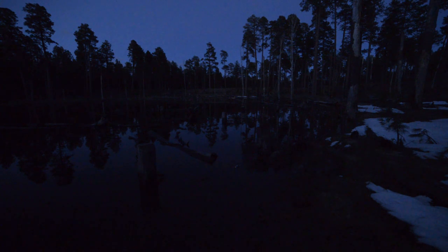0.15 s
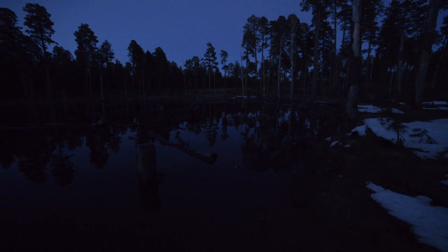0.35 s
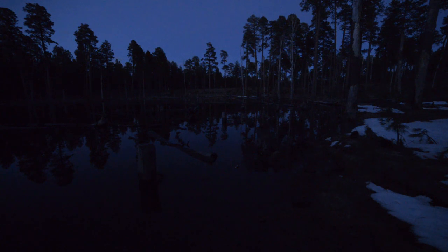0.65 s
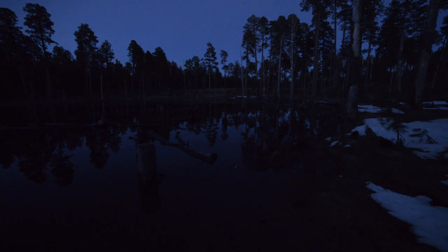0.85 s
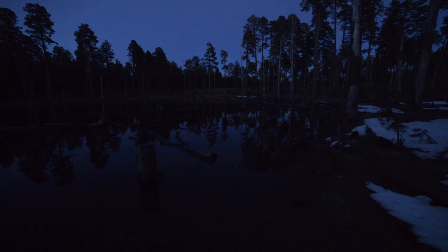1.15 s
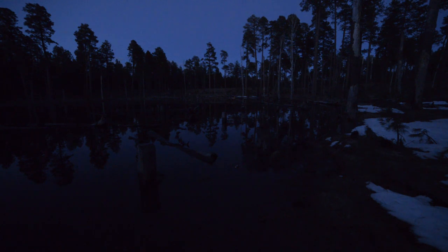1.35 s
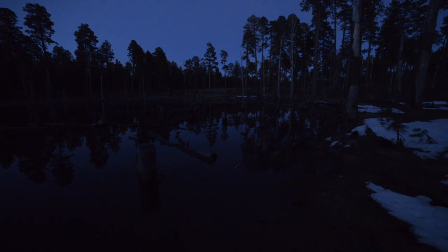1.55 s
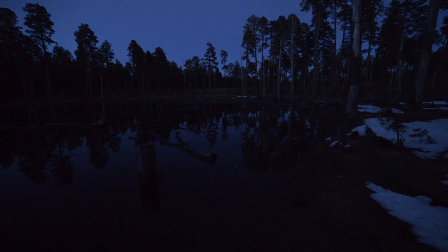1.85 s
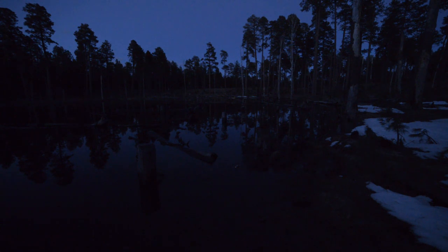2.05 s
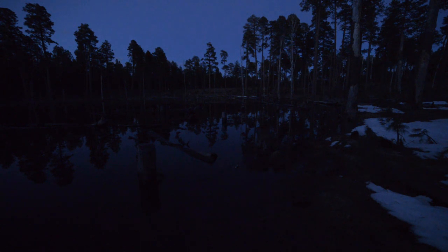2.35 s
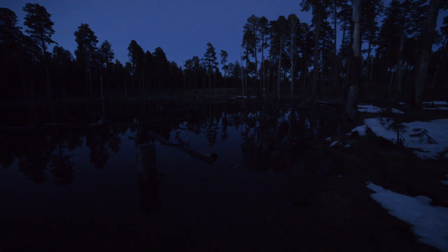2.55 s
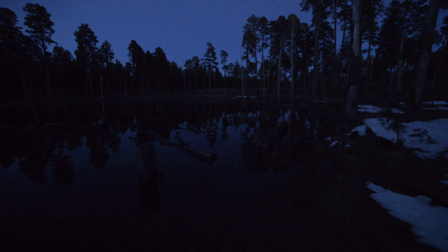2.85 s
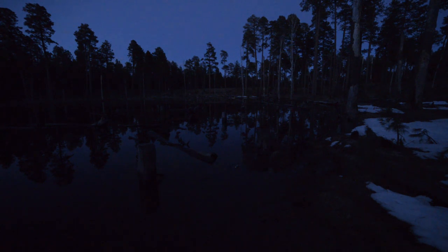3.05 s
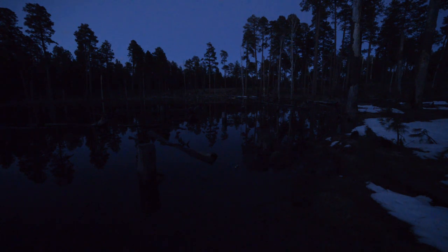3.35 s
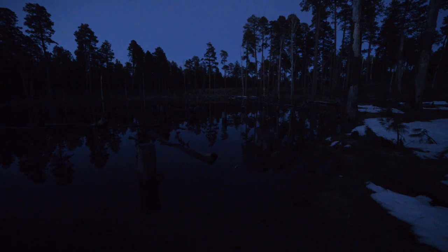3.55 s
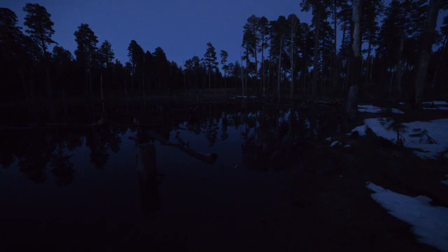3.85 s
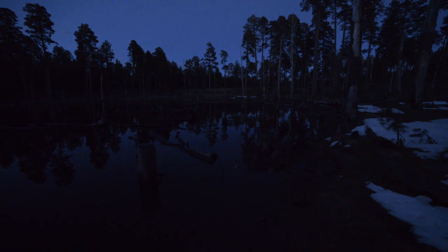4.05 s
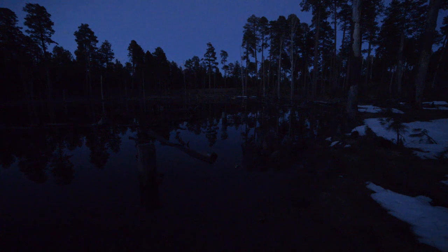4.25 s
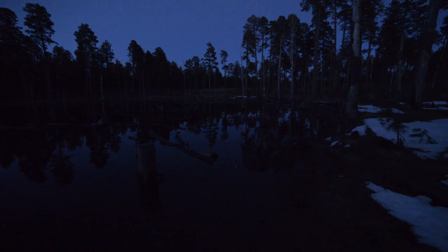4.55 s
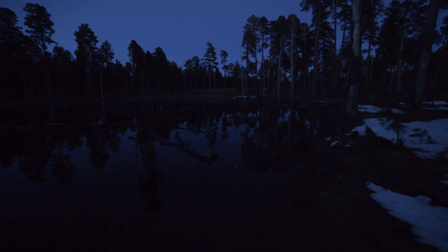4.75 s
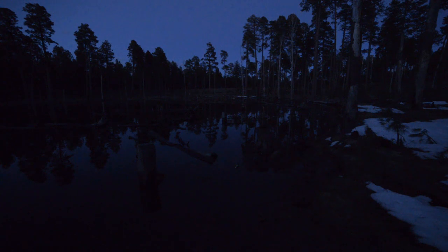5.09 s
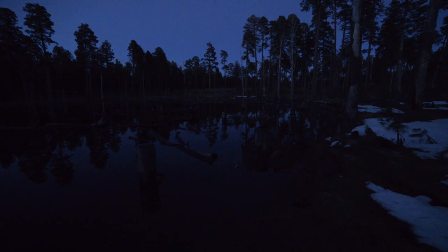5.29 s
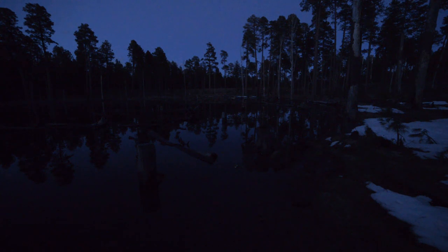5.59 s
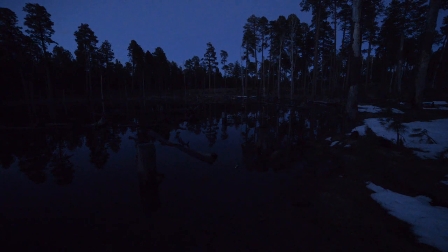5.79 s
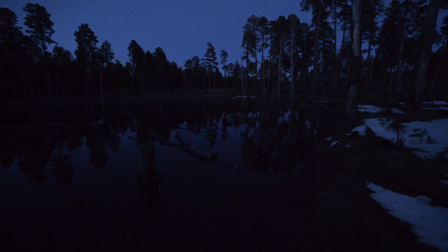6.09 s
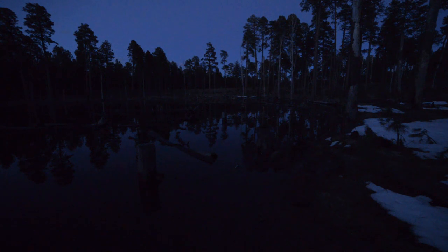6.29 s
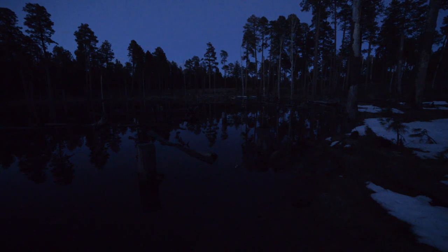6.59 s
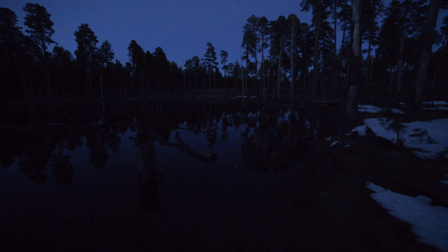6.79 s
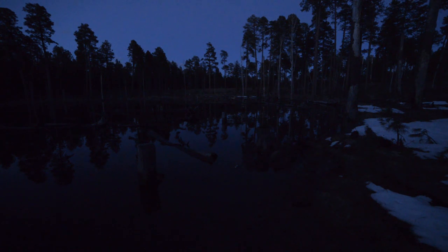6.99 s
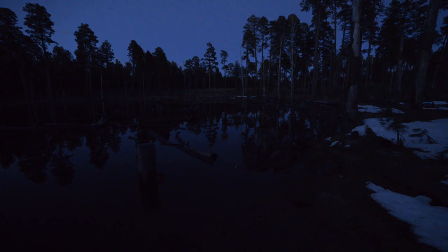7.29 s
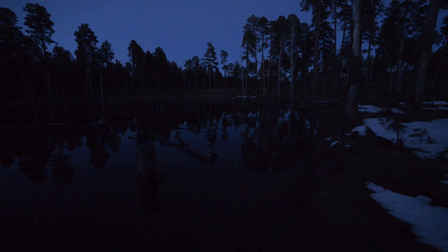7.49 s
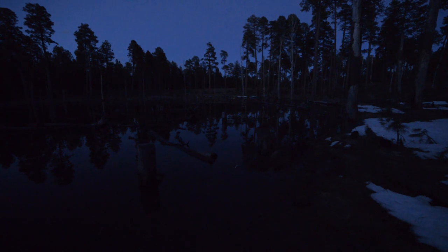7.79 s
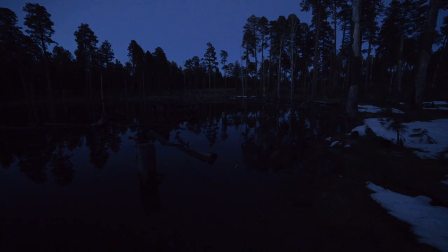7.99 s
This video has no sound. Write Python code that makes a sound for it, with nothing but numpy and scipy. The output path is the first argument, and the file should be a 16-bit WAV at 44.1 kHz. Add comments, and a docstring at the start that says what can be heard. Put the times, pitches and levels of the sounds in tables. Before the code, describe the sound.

Close frogs trade short, hard, rattling croaks over a steady high chorus farther across a still woodland pond, trees returning a diffuse echo.

```python
"""Frogs call densely close by on a forest pond at dusk, in short rattling notes made of tone pulses.
The second harmonic of each pulse rings in the vocal sac; the nearest frogs take turns, with loud croaks among
their notes, and one harsh voice joins for a bout. A crowd calls farther off and the trees return a soft echo.
Far off lie a low rumble and a faint hum, over still air and microphone hiss. Once a thin high call,
perhaps a bird, swells twice. Wandering tones make the rumble, hum and call; shaped noise makes the hiss."""
import sys
import numpy as np
from scipy import signal
from scipy.fft import rfft, irfft, next_fast_len
from scipy.io import wavfile

SR = 44100
rng = np.random.default_rng(int(sys.argv[2]) if len(sys.argv) > 2 else 0)


def transcribe(u):
    """Save the signal u as a 16-bit wav file named by the first command-line argument.

    u: samples, shape (n,) or (channels, n), limited to [-1, 1]; the rate is SR.
    q: integer samples, one column per channel.
    """
    v = np.clip(np.atleast_2d(u).T, -1, 1)
    q = np.round(v * 32767).astype(np.int16)
    wavfile.write(sys.argv[1], SR, q)


N = 358533
TIME = np.arange(N) / SR
PULSE_TIME = np.arange(-200, 280) / SR   # seconds around the peak of a pulse
TURN_S = .038   # the near frogs' notes follow one another about this far apart


def near_frogs(count=3, pulse_gap_s=.0066, flank_db=-3.5, effort_db=1.2, uneven_db=2.0,
               size_spread=0.016, pitch_spread=0.029, bright_db=-0.5, bright_spread_db=3.0,
               croak_db=-2.0, overtone_db=26.5):
    """Each note is a quick rattle, strongest in its middle pulse; in a loud croak that pulse stands far out."""
    # The loudest croaks close to the microphone. Each row: start of the main pulse in seconds,
    # peak level in dB before the croak trim, vocal sac pitch in Hz, overtone level in dB before the overtone lift.
    loud_croaks = [(0.0315, -12.5, 2558, -37), (0.0994, -10.5, 2430, -43), (0.142, -10.5, 2530, -37),
                   (0.252, -8.5, 2540, -37), (0.3567, -16.5, 2483, -36), (0.7634, -10.5, 2490, -42),
                   (0.8599, -10.5, 2470, -38.5), (0.906, -18, 2480, -42), (1.0915, -13, 2470, -42),
                   (1.231, -11, 2417, -37), (1.3357, -13.5, 2590, -41), (1.6031, -13, 2510, -39),
                   (1.7237, -11.5, 2360, -40), (1.8163, -12.5, 2450, -38), (1.8695, -11, 2450, -40),
                   (1.9974, -12, 2439, -33), (2.153, -12, 2430, -43), (2.3458, -13.5, 2490, -40),
                   (2.5061, -14, 2620, -39), (2.5434, -15.5, 2400, -41), (2.805, -12.5, 2400, -46),
                   (3.1837, -11.5, 2360, -39.5), (3.3073, -12.5, 2510, -40), (3.5369, -12, 2550, -41),
                   (3.5668, -11, 2580, -43), (3.6132, -17, 2395, -43), (3.8981, -11, 2500, -40),
                   (3.9611, -14.5, 2480, -43.5), (4.0058, -14.5, 2530, -44), (4.1562, -10.5, 2420, -40.5),
                   (4.2084, -10.5, 2480, -44), (4.2887, -14, 2370, -38.5), (4.3207, -13.5, 2420, -37),
                   (4.3819, -10.5, 2400, -40.5), (4.5106, -20, 2550, -42), (4.6504, -12, 2420, -38),
                   (4.9135, -11, 2430, -43), (5.1002, -11, 2380, -40), (5.2565, -10.5, 2520, -39),
                   (5.4486, -12, 2480, -43), (5.8959, -11, 2430, -37), (6.1176, -12, 2410, -35),
                   (6.325, -10, 2580, -34.5), (6.7134, -14.5, 2660, -43), (7.1145, -12, 2520, -41.5),
                   (7.3734, -12, 2510, -38.5), (7.4291, -12.5, 2530, -37.5), (7.4626, -13, 2440, -39),
                   (7.5438, -12, 2490, -42), (7.9186, -13, 2300, -45), (8.073, -10.5, 2490, -36)]
    pulse_rise_s = 0.0017975   # from the start of a pulse to its peak
    note_db, note_sac_hz = -18.5, 2490   # typical level and pitch of an ordinary note
    croak_s, peak_db, sac_hz, overtones_db = np.transpose(loud_croaks)
    note_s, loud = take_turns(croak_s + pulse_rise_s)

    middle = count // 2
    beat = np.arange(count) - middle
    effort, size, tempo, colour = np.tanh(rng.standard_normal((4, len(note_s), 1)))
    strength, bend = rng.standard_normal((2, len(note_s), count))
    times = note_s[:, None] + beat * pulse_gap_s * (1 + 0.403 * tempo)
    flanks_db = np.abs(beat) * (flank_db + uneven_db * np.tanh(strength))
    level_db = note_db + effort_db * effort + flanks_db
    hz = note_sac_hz * np.exp(size_spread * size + pitch_spread * bend)
    brightness_db = np.repeat(bright_db + bright_spread_db * colour, count, axis=1)

    # a loud croak sets its own middle pulse
    level_db[loud, middle] = peak_db + croak_db
    hz[loud, middle] = sac_hz
    brightness_db[loud, middle] = overtones_db - peak_db + overtone_db
    return pulses(times.ravel(), level_db.ravel(), hz.ravel() / 2, brightness_db.ravel(), rasp_db=-27)


def take_turns(loud_s, unsteady=.42):
    """Fill the time between loud croaks at a loose beat; give note times and which notes are the loud ones."""
    anchors = np.concatenate([[-TURN_S], loud_s, [N / SR + TURN_S]])
    turns_between = np.maximum(np.round(np.diff(anchors) / TURN_S), 1)
    turn_at = np.concatenate([[0], np.cumsum(turns_between)]).astype(int)
    slip = unsteady * rng.uniform(-1, 1, turn_at[-1] + 1)   # in turns
    slip[turn_at] = 0   # the loud croaks keep their times
    return np.interp(np.arange(len(slip)) + slip, turn_at, anchors), turn_at[1:-1]


def harsh_frog(count=13, pulse_gap_s=.005, uneven_db=4.5, pitch_spread=.03):
    """A small frog with strong overtones repeats a two-pulse note at a steady tempo for one bout."""
    start_s, note_gap_s = 4.89, .084
    typical_db, sac_hz, overtone_lift_db = -23.5, 2660, 6
    note_s = start_s + note_gap_s * np.arange(count)[:, None]
    times = (note_s + pulse_gap_s * np.arange(2)).ravel()
    strength, bend = rng.standard_normal((2, len(times)))
    hz = sac_hz * np.exp(pitch_spread * bend)
    brightness_db = np.full(len(times), overtone_lift_db)
    return pulses(times, typical_db + uneven_db * strength, hz / 2, brightness_db, rasp_db=-24)


def crowd(count=22, notes_per_s=12.0, pulse_gap_s=.008, pitch_spread=0.058, level_spread_db=1.0,
          fade_db=1.53, gain_db=-2.5, sharp=0.011):
    """Each far frog has its own size, tempo and rattle; a note is three quick pulses that tend to fade."""
    # The drift of the far crowd, read between rows. Each row: time in seconds, level in dB before gain_db,
    # central vocal sac pitch in Hz before the slight sharpening.
    crowd_drift = [(0.3, -25.5, 2504), (0.34, -24.5, 2483), (1.58, -25, 2444), (2.38, -24, 2535),
                   (3.11, -26, 2450), (3.36, -24, 2453), (7.83, -25, 2490), (8.0, -24, 2497)]
    times, level_db, detune = [], [], []
    note, beat = np.arange(140)[:, None], np.arange(3)
    for rank in np.linspace(-1, 1, count):   # from the largest, deepest frog to the smallest
        tempo, rattle, start = rng.uniform(-1, 1, 3)
        timing, effort, bend = rng.standard_normal((3, len(note), 1))
        note_count = note + start - 2 + .15 * np.cumsum(timing, axis=0)   # the beat wanders
        onsets = note_count / (notes_per_s * (1 + .2 * tempo))
        loose_beat = beat + .1 * rng.standard_normal((len(note), len(beat)))
        times.append(onsets + loose_beat * pulse_gap_s * (1 + .3 * rattle))
        level_db.append(level_spread_db * effort - fade_db * beat)
        note_detune = pitch_spread * (1.41 * rank + 0.96 * np.tanh(bend))
        detune.append(np.repeat(note_detune, len(beat)))
    times, level_db, detune = np.ravel(times), np.ravel(level_db), np.ravel(detune)
    crowd_db, sac_hz = at_times(crowd_drift, times)
    brightness_db = rng.normal(-1.2, 3.7, len(times))
    hz = sac_hz / 2 * np.exp(detune + sharp)
    return pulses(times, crowd_db + gain_db + level_db, hz, brightness_db, rasp_db=-24.0)


def pulses(times, level_db, hz, bright_db, rasp_db, onset_sharp=0.022):
    """The larynx buzzes briefly with a little rasp; the vocal sac rings the second harmonic and peaks just after."""
    # Partials of one pulse. Each row: multiple of the fundamental, relative level in dB,
    # half length in seconds, lead before the sac's peak in seconds.
    pulse_partials = [(1, -15.5, 0.00076, 0.0034), (2, 1, 0.0011, 0), (3, -23.5, 0.0012, 0.0013),
                      (4, -36.5, 0.0011, 0.00081)]
    # Colour of the larynx rasp. Each row: frequency in Hz, relative density in dB per Hz.
    rasp_spectrum = [(500, -20.5), (900, -6), (1800, 1.5), (3400, 6), (4400, -2.5), (5400, -9.5),
                     (6300, -19.5), (8000, -27.5), (12000, -41)]
    cycles = (hz[:, None] * PULSE_TIME + rng.random((len(times), 1))).astype(np.float32)
    gain, bright = from_db(level_db)[:, None], from_db(bright_db)[:, None]
    tone = 0
    for k, (multiple, db, half_s, lead_s) in enumerate(pulse_partials):
        strength = gain * from_db(db) * (bright if k > 1 else 1)   # brightness lifts partials above the second
        pitch = round(multiple) * (1 if k == 1 else 1 + onset_sharp)   # all but the second are a little sharp
        tone = tone + strength * swell(half_s, lead_s) * np.sin(np.float32(2 * np.pi * pitch) * cycles)
    airflow_power = place(times, (gain * bright * swell(half_s=0.0013, lead_s=.0012)) ** 2)
    rasp = from_db(rasp_db) * np.sqrt(airflow_power) * noise(rasp_spectrum)
    return place(times, tone) + rasp


def swell(half_s, lead_s, skew=0.22):
    """Bell-shaped outline of a pulse that dies a little more slowly than it rises."""
    t = PULSE_TIME + lead_s
    width_s = half_s * (1 + np.clip(skew, 0, .6) * np.tanh(t / half_s))
    return np.exp(-.5 * (t / width_s) ** 2)


def place(times, shapes):
    """Sum short shapes, one a row, with their peaks at the given times."""
    at = (np.round(times * SR)[:, None] + np.round(PULSE_TIME * SR)).astype(int)
    inside = (at >= 0) & (at < N)
    return np.bincount(at[inside], shapes[inside], N)


def forest(x, t60=0.88, delay_s=.05, dull_hz=4500, count=10, turn_s=.03):
    """The trunks around the pond scatter a dull echo; overlapping moments of the chorus take different paths."""
    t = TIME[:SR]
    x = np.concatenate([x[-SR:], x])   # the chorus is already under way, so the echo starts full
    turns, out = np.arange(len(x)) / SR / turn_s, 0
    for spot in range(count):
        share = np.sin(np.pi / 2 * np.minimum((turns - spot) % count, 2))   # open for two turns in every cycle
        echo = rng.standard_normal(SR) * from_db(-60 * t / t60) * (1 - np.exp(-t / delay_s))
        out = out + signal.fftconvolve(x * share, echo / np.linalg.norm(echo))
    return signal.sosfilt(signal.butter(2, dull_hz, fs=SR, output="sos"), out)[SR:SR + N]


def thin_call():
    """A thin high whistle, a wavering tone that swells twice, perhaps a bird."""
    # Swells of the call. Each row: peak in seconds, level in dB, rise in dB per second, fall in dB per second.
    call_swells = [(4.315, -53.5, 400, 35), (4.815, -54, 90, 400)]
    outlines_db = [db - np.maximum(rise * (s - TIME), fall * (TIME - s)) for s, db, rise, fall in call_swells]
    return from_db(np.max(outlines_db, axis=0)) * wavering_tone(hz=4930, width_hz=140)


def rumble(width_hz=51, swell_width_hz=45):
    """A steady far rumble with a faint upper band; now and then it swells and sinks again."""
    # Swells of the distant rumble. Each row: peak in seconds, level in dB, half length in seconds, centre in Hz.
    far_swells = [(0.498, -57, .45, 150.2), (2.1, -60.5, .45, 150), (3.45, -58.5, 0.31, 304.7),
                  (3.66, -50.5, .21, 190), (4.25, -56.5, .3, 130), (4.6, -64, .7, 351),
                  (8.1, -53.5, .38, 188)]
    steady_db = -59
    steady = wavering_tone(158.4, width_hz) + from_db(-11.5) * wavering_tone(325, width_hz=18)
    swells = 0
    for s, db, half_s, hz in far_swells:
        outline = np.exp(-.5 * ((TIME - s) / half_s) ** 2)
        swells = swells + from_db(db) * outline * wavering_tone(hz, swell_width_hz)
    return from_db(steady_db) * steady + swells


def background(hum_fade_db_per_s=.55):
    """Far rumble, a slowly fading hum made of a wavering tone, and the noise of still air and microphone."""
    # Still air and microphone hiss. Each row: frequency in Hz, relative density in dB per Hz.
    air_spectrum = [(20, -12), (45, -7), (100, -0.5), (330, -2), (600, -2.5), (1500, 1), (4000, -12.5),
                    (7000, -21), (10000, -22.5), (15500, -24)]
    hum_start_db, air_db = -61, -49
    hum = from_db(hum_start_db - hum_fade_db_per_s * TIME) * wavering_tone(hz=99.3, width_hz=7)
    return rumble() + hum + from_db(air_db) * noise(air_spectrum)


def wavering_tone(hz, width_hz):
    """A tone whose strength and phase wander enough to spread it into a band, rms 1."""
    lowpass = signal.butter(2, width_hz, fs=SR, output="sos")
    wander = signal.sosfilt(lowpass, rng.standard_normal((2, N + SR)))[:, SR:]   # drop the filter's start
    phase = 2 * np.pi * np.cumsum(hz * np.ones(N)) / SR
    return rms_one(wander[0] * np.cos(phase) + wander[1] * np.sin(phase))


def noise(spectrum):
    """Random noise shaped to the given spectrum, rms 1."""
    hz, db = np.transpose(spectrum)
    size = next_fast_len(N)
    bins = np.maximum(np.fft.rfftfreq(size, 1 / SR), 1)
    gain = from_db(np.interp(np.log(bins), np.log(hz), db))
    return rms_one(irfft(rfft(rng.standard_normal(size)) * gain, size)[:N])


def at_times(rows, times):
    """Each column of a curve, read at the given times."""
    s, *columns = np.transpose(rows)
    return [np.interp(times, s, c) for c in columns]


def rms_one(x):
    """Scale to unit rms."""
    return x / np.sqrt(np.mean(x ** 2) + 1e-20)


def from_db(db):
    """Decibels to gain."""
    return 10 ** (np.asarray(db) / 20)


def scene():
    """Near frogs, the harsh one and the far crowd, their echo, the thin call and the background."""
    frogs = near_frogs() + harsh_frog() + crowd()
    echo = from_db(-3.5) * forest(frogs)
    return (frogs + echo + thin_call() + background())[None]


def record(dry, cutoff_hz=15750):
    """The top is cut steeply above the cutoff."""
    return signal.sosfilt(signal.ellip(12, .1, 90, cutoff_hz, fs=SR, output="sos"), dry)


dry = scene()
out = record(dry)
transcribe(out)
```